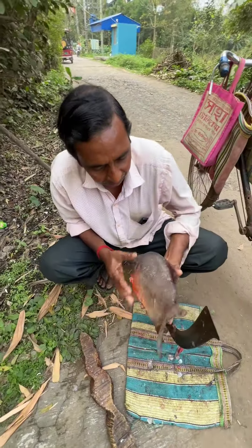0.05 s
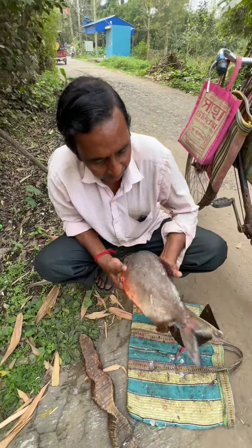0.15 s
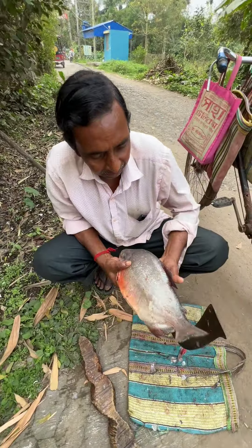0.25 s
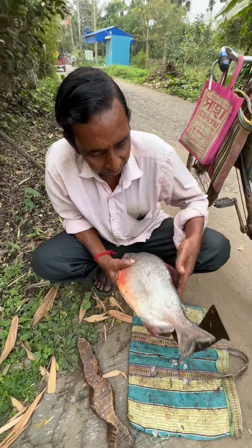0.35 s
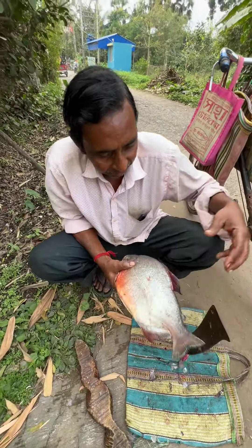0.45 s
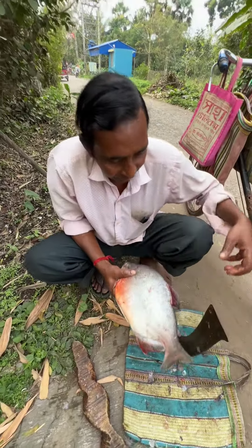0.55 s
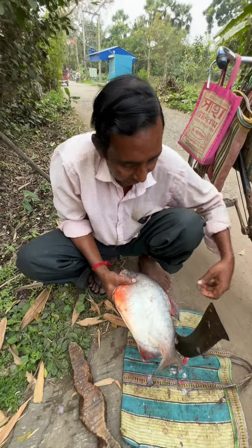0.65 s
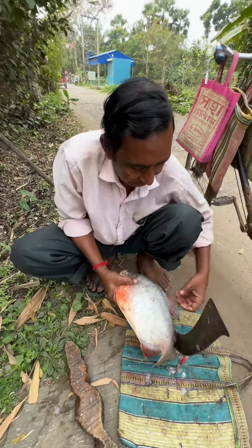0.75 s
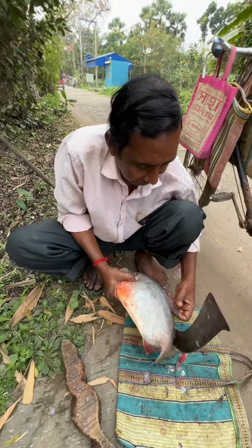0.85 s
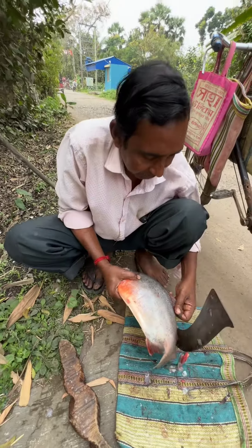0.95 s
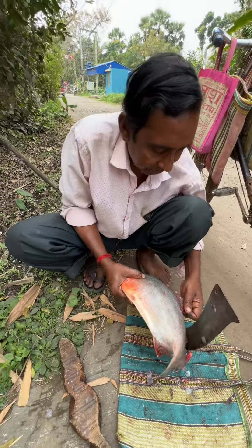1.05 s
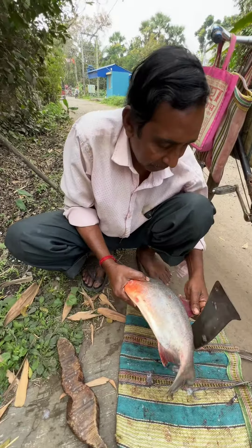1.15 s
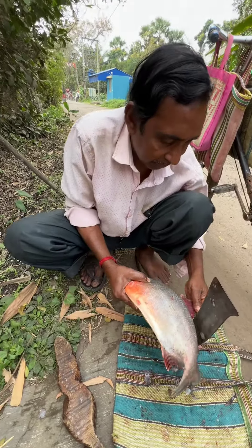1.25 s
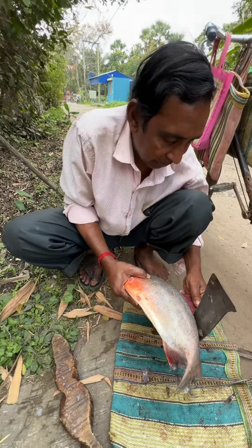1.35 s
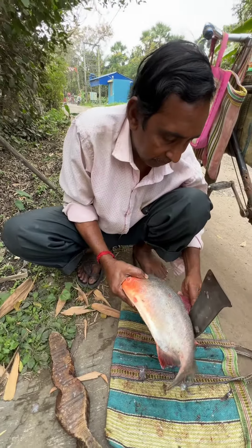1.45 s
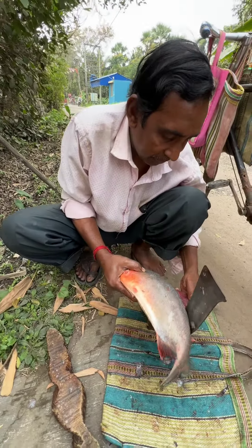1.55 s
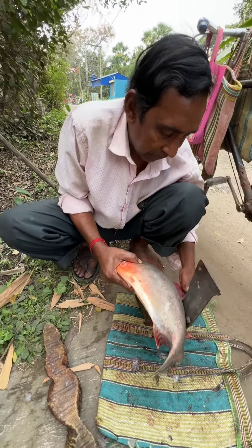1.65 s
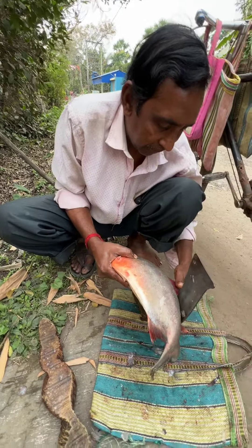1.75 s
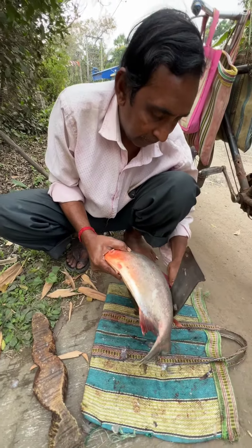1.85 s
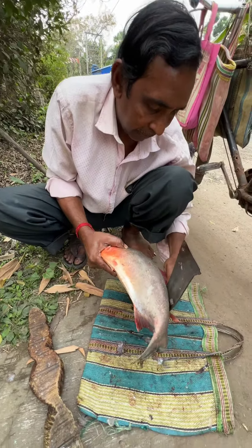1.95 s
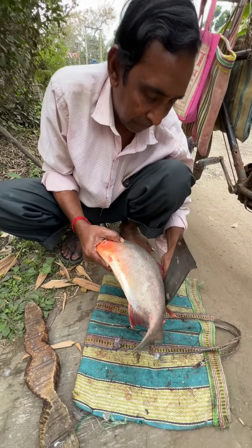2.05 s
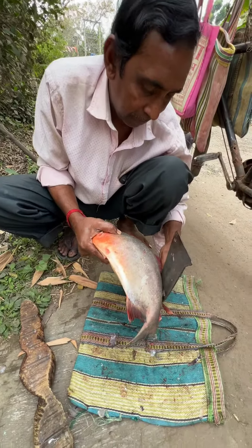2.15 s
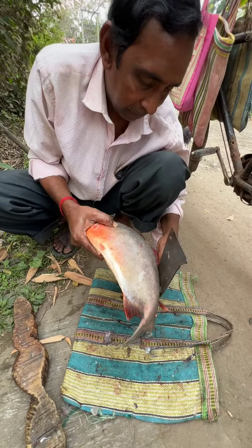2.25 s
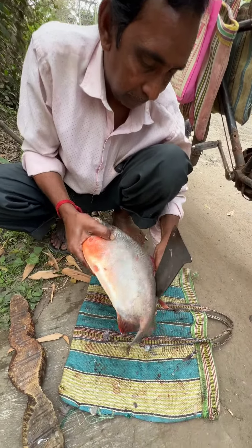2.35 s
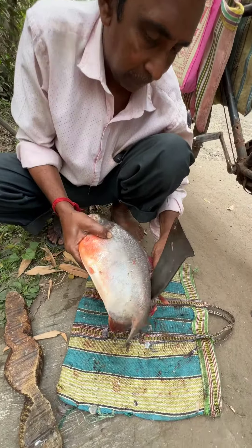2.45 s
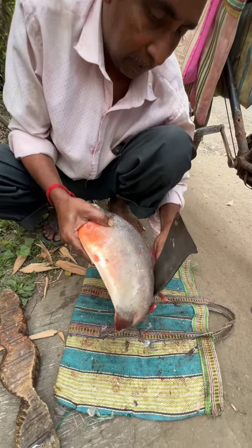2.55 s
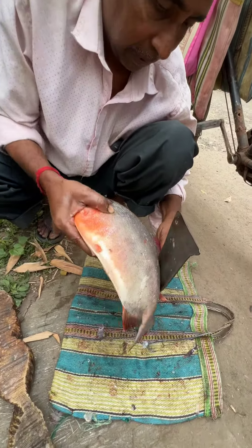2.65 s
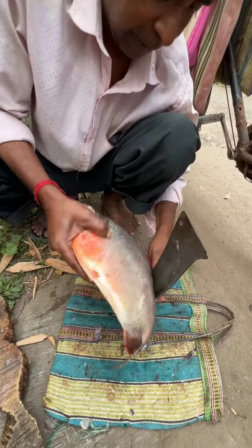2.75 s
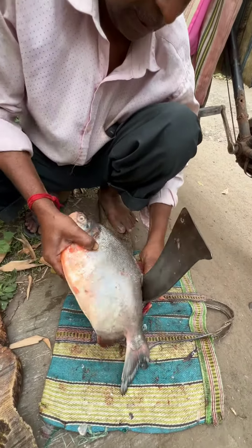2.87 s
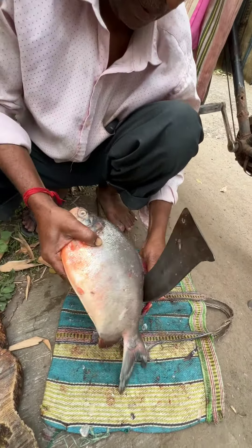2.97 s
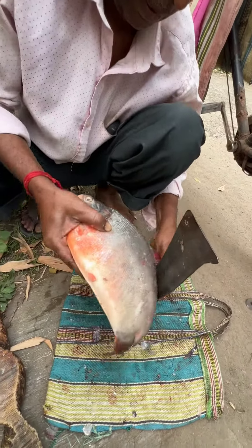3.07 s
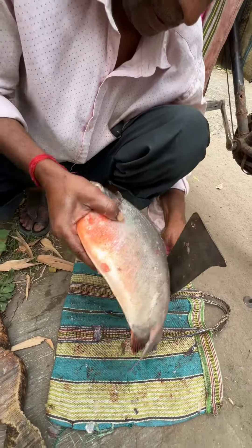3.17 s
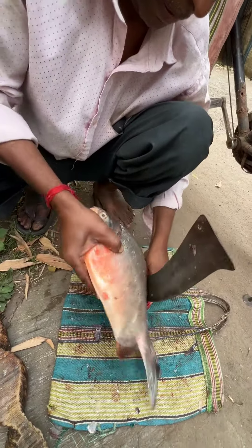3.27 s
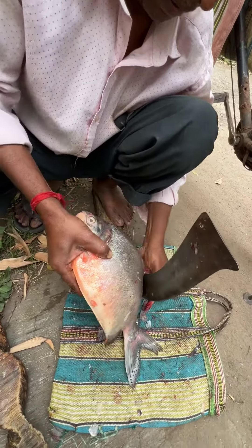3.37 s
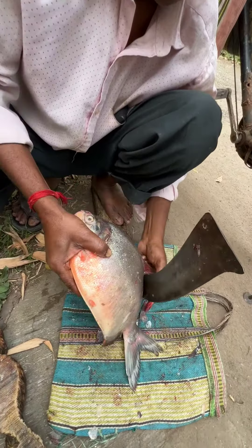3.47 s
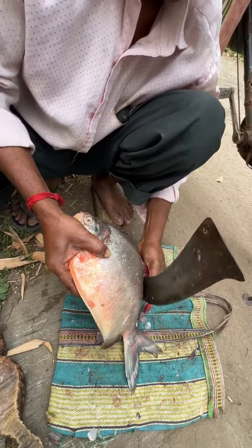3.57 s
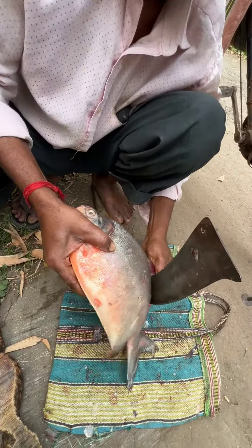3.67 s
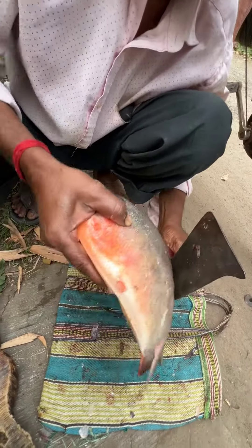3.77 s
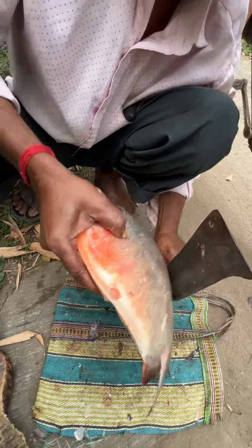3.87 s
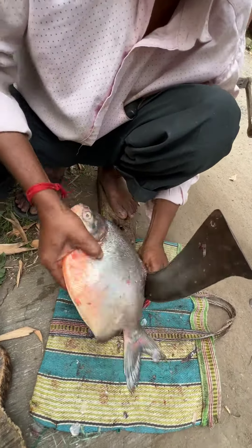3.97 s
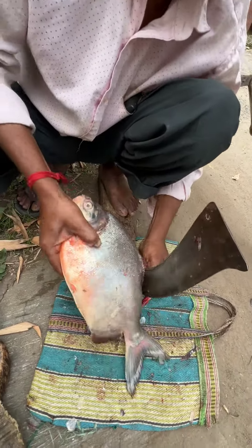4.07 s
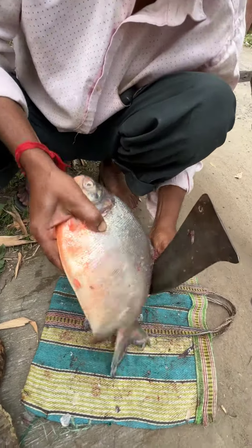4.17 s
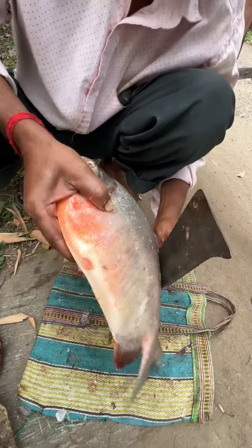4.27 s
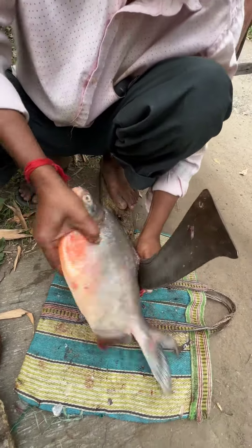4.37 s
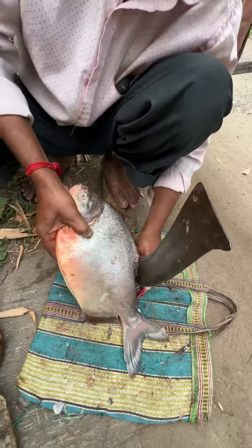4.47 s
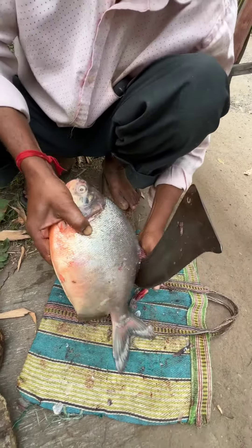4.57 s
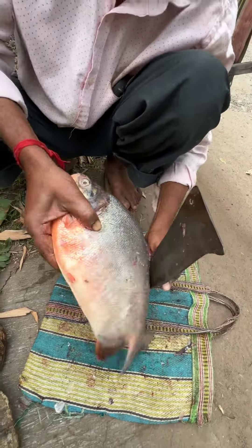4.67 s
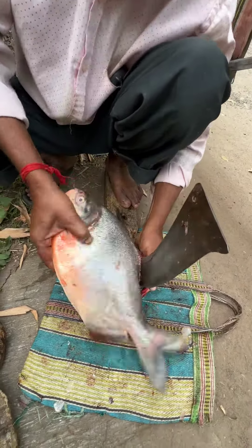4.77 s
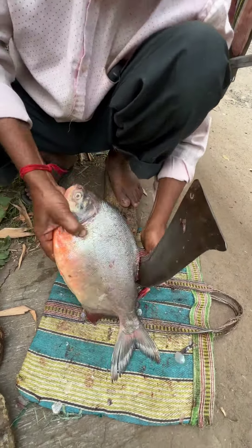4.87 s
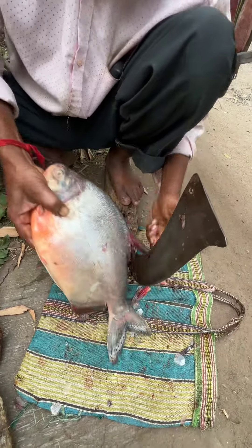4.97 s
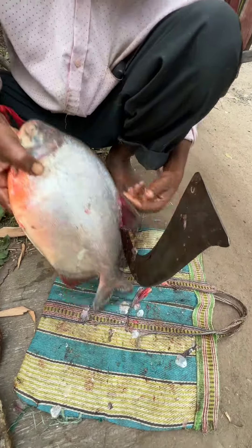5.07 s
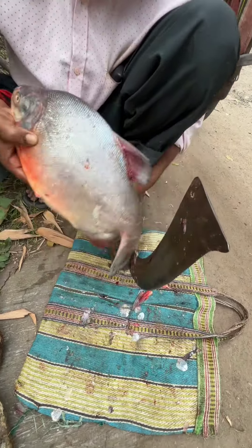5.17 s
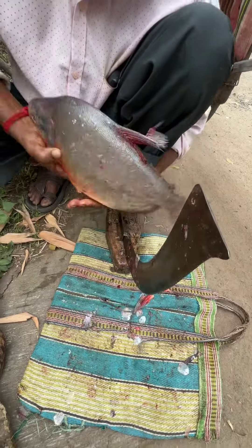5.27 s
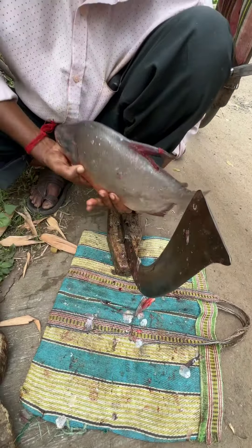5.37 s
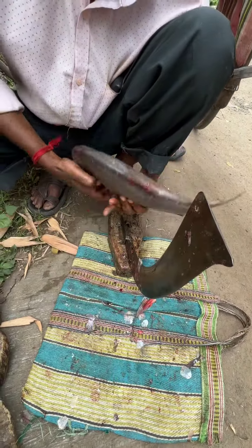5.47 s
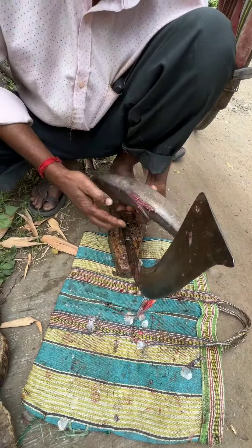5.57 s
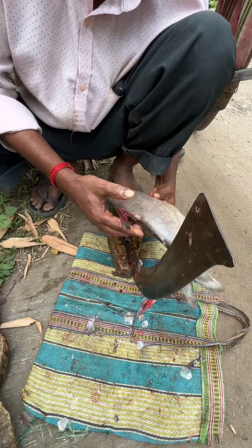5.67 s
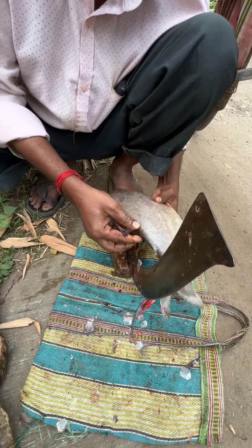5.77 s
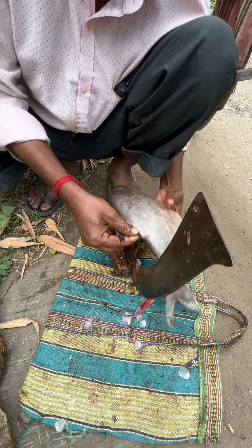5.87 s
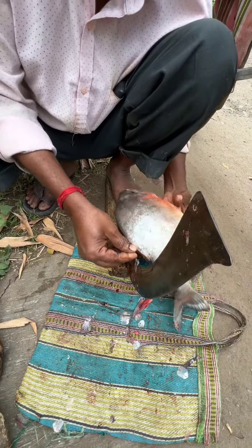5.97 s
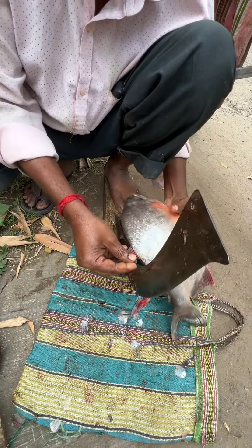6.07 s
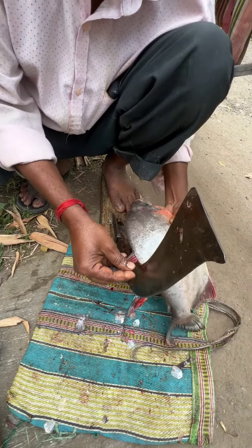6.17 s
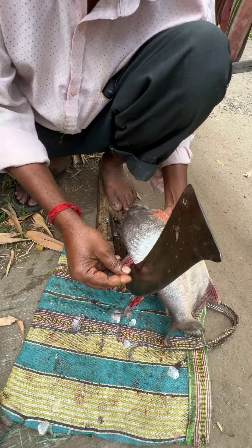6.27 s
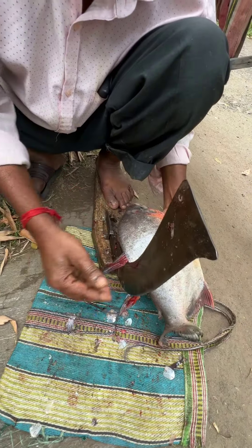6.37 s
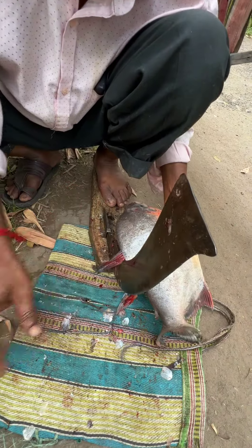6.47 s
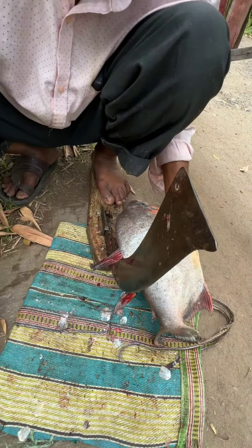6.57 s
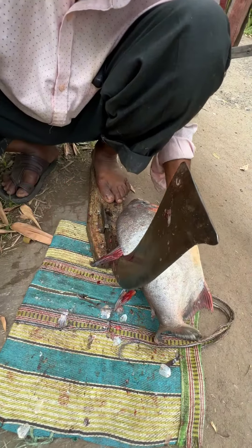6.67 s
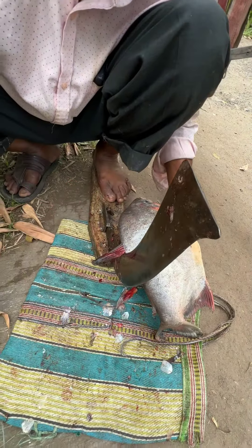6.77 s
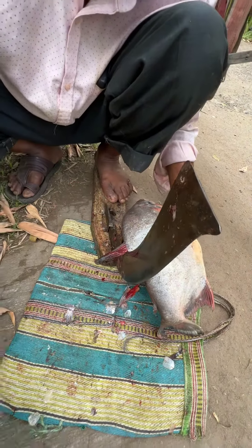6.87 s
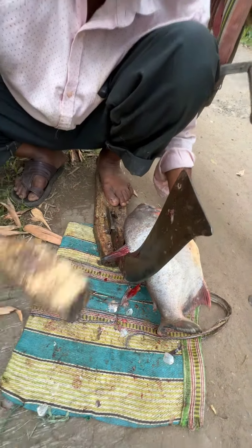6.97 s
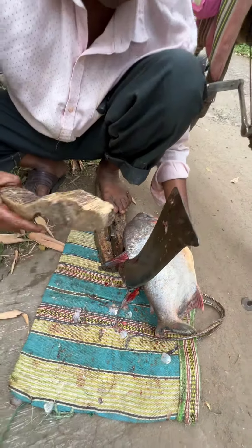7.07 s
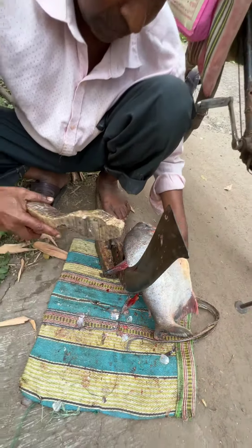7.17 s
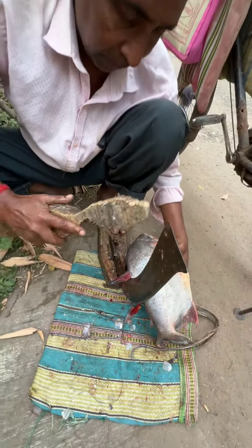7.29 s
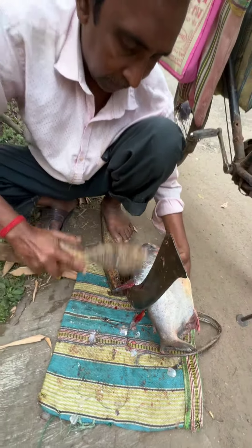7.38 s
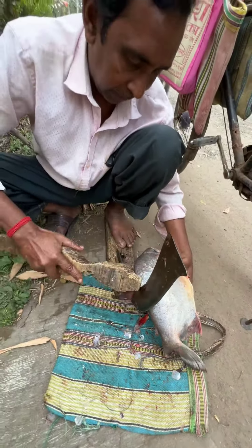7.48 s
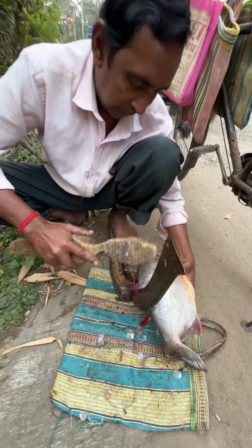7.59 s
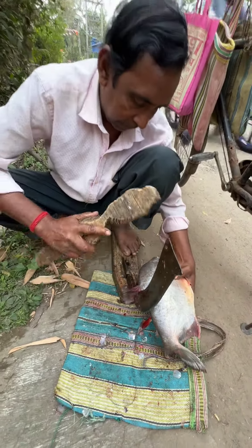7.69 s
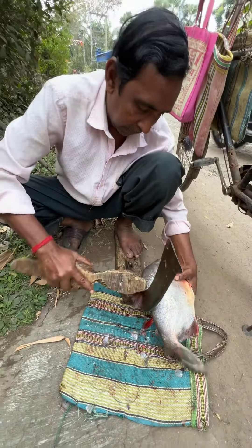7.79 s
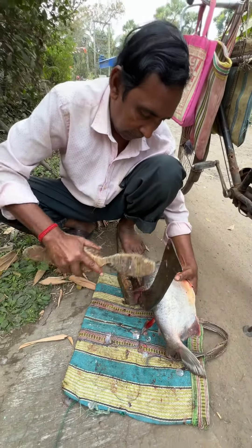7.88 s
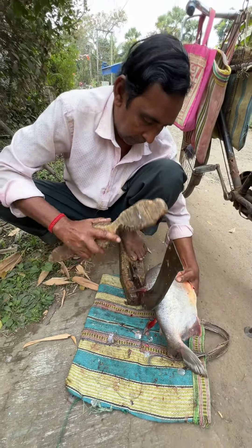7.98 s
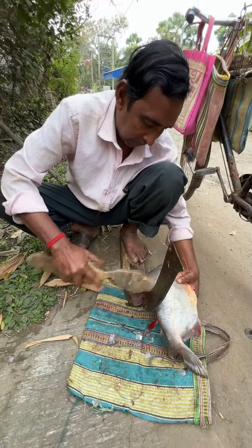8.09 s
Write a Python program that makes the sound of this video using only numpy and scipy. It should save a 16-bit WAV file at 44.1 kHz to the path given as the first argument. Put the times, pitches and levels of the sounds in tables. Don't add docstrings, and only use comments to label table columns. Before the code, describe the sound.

A fish is turned with quiet, damp scrapes while a distant bird whistles. From just after two seconds it is pushed against a steel edge in irregular strokes: dry crackling, hard clicks, short metallic pings, small squeaks. The work pauses, cloth rustles faintly, and a puttering vehicle grows from far off to loud. Woody knocks and a squeak finish over its throb. Close, dry, open-air phone pickup.

```python
import sys
import numpy as np
from scipy import signal
from scipy.fft import rfft, irfft, next_fast_len
from scipy.io import wavfile
from scipy.ndimage import uniform_filter1d, map_coordinates

SR = 44100
rng = np.random.default_rng(int(sys.argv[2]) if len(sys.argv) > 2 else 0)


def to_linear_factor(level_db):
    exponent = np.asarray(level_db, float) / 20
    return 10 ** exponent


def digitize_waveform(pressure):
    field = np.atleast_2d(pressure).T
    bounded = np.clip(field, -1, 1)
    quanta = np.round(bounded * 32767).astype(np.int16)
    wavfile.write(sys.argv[1], SR, quanta)


N = 358533

# (time [s], length [s], share of length at most pressure [0-1],
# rasp level [dB], flesh level over rasp [dB])
TURN_STROKES = [(0, 0.083, 0.3, -49, 4), (.183, 0.08, 0.25, -36, -2.5), (.393, 0.081, 0.76, -43.5, 5),
                (.559, 0.041, 0.34, -38, -4), (.59, 0.098, 0, -30.5, -4), (.86, 0.11, 0.5, -36, 0.5),
                (1.084, 0.1, 0.2, -45, -5), (2.208, 0.067, 0.6, -35.5, -7.5)]
CUT_STROKES = [(2.3, 0.072, 0.97, -43, 0.5), (2.361, 0.1, 0.38, -38, -0.5), (2.58, 0.097, 0.47, -51.5, -1),
               (2.737, 0.12, 0.67, -27.5, -3.5), (3.007, 0.049, 0.21, -32, -8.5),
               (3.217, 0.074, 0.72, -30.5, -1), (3.273, 0.077, 0.19, -32, -7),
               (3.539, 0.067, 0.45, -31.5, -1.5), (3.68, 0.057, 0.396, -22.5, -6),
               (3.72, 0.114, 0, -46.5, 5), (3.868, 0.1206, 0.63, -33, 3.5),
               (3.993, 0.01503, 0.28, -14.5, -25), (4.145, 0.069, 0.21, -43, 1.5),
               (4.33, 0.083, 0.073, -33.5, 4.5), (4.39, 0.065, 0, -30.5, -8),
               (4.567, 0.0257, 0.59, -50.5, 6.5), (4.61, 0.055, 0.386, -53.5, 7.5),
               (4.71, 0.078, 0, -40, 5), (4.811, 0.05, 0.55, -42, -15), (5.19, 0.082, 0, -33.5, -18.5),
               (5.15, .024, 0.64, -49, -16), (4.965, 0.043, 0.11, -50, -9)]
CLUB_STROKES = [(7.243, 0.068, 0.61, -27, 1), (7.328, 0.087, 0.53, -25.5, 0.43),
                (7.433, 0.04, 0.091, -25.5, 2), (7.785, 0.0605, 0.105, -30, 3.6)]
# (frequency [Hz], level [dB per Hz])
SCALE_SPECTRUM = [(1760, -21.5), (3000, -12), (4200, -5.5), (5300, -0.5), (6800, -5.5), (8400, -5),
                  (10800, -10.5), (12000, -22.5), (14000, -15.5), (15700, -19), (16200, -32), (16500, -54)]
# (frequency [Hz], level [dB per Hz])
FLESH_SPECTRUM = [(150, -40), (250, -4), (492, -4), (650, -1), (808, -4), (1000, -3), (1440, -4.5),
                  (2340, -6), (3490, -9), (4500, -19), (5850, -45.5), (9900, -120)]
# (time [s], bright crack level [dB], dull crack level [dB], dull centre [Hz])
SNAPS = [(.002, -45, -32, 1500), (0.191, -29, -38, 2410), (0.2972, -45, -31, 1580),
         (.5715, -39, -39.5, 3000), (.605, -36, -31, 2170), (1.767, -30, -22, 1730),
         (2.2957, -26.5, -36, 3470), (2.3261, -14.5, -22.5, 2680), (2.33, -17, -34, 3000),
         (2.374, -11, -25, 3000), (2.393, -11.5, -22, 2730), (2.761, -12, -32, 2200),
         (2.7777, -11, -17, 2720), (2.789, -5.5, -24, 3300), (2.799, -13, -31, 3500),
         (2.8112, -4.5, -20, 3040), (2.821, -7, -14, 2470), (3.016, -23, -36, 3500),
         (3.0228, -38.5, -13.5, 3320), (3.256, -15, -8, 3280), (3.2842, -11.5, -1.5, 3010),
         (3.563, -12, -32, 2360), (3.645, -31, -52.5, 2670), (3.935, -5.5, -1, 3125), (3.997, -3, -7, 3050),
         (4.3398, -7.5, -12.5, 2450), (4.4007, -17, -25, 2640), (4.7138, -2, -13.5, 2380),
         (4.8185, -30, -39, 2800), (5.208, -15, -33, 3500), (5.264, -26, -28, 3500)]
KNOCKS = [(7.2767, -21, -20, 2200), (7.336, -21, -16, 1782), (7.437, -11.5, -12, 3000),
          (7.4425, -17, -8.5, 1880), (7.793, -26, -7, 2700), (7.794, -9, -16, 990),
          (7.8001, -28, -20, 1381), (7.832, -15, -8, 2640), (7.876, -31, -13.5, 2360)]
TICKS = [(1.972, -49, -36, 3000), (2.9859, -28, -42, 3500), (3.1146, -22, -41.5, 3500),
         (3.1445, -36.5, -34, 3500), (3.1824, -31, -42.5, 3500), (3.2294, -21, -21, 2600),
         (3.2592, -10.5, -16, 4000), (3.3216, -20, -33, 3000), (3.5489, -34, -24, 2400),
         (3.8815, -32, -38, 2800), (3.8999, -30, -33, 2800), (3.9375, -12, -19, 3000),
         (4.7947, -32.5, -50.5, 3500), (4.8218, -34, -43, 3500), (4.863, -30, -50.5, 3503),
         (4.908, -45, -54.5, 3540), (4.9686, -37, -52.5, 3500), (5.129, -36, -52, 3511),
         (5.1534, -33, -48, 3500), (5.166, -33, -50, 3500), (5.2038, -18, -31, 3500),
         (7.2664, -23, -20, 2200), (7.2914, -18, -35, 2200), (7.369, -22, -23, 1800),
         (7.4523, -17, -13, 2600), (7.54, -36.5, -23, 2400), (7.5945, -22, -24, 2375),
         (7.6525, -30, -13.5, 2200), (8.035, -19, -33.5, 2400), (8.125, -12, -13, 2400),
         (6.022, -52, -62, 3500), (6.925, -40, -51.5, 3508)]
# (time [s], frequency [Hz], level [dB])
BODY_TAPS = [(.296, 1600, -34.5), (.512, 2070, -39.5), (1.762, 1697, -33.5), (2.82, 279, -24.5),
             (3.284, 336, -26.5), (3.93, 686, -25), (3.941, 980, -26), (3.886, 1050, -34),
             (4.365, 720, -30), (3.57, 950, -34), (3.7, 950, -32), (3.26, 950, -30), (.21, 490, -38),
             (7.834, 620, -22), (7.44, 330, -22), (4.735, 723, -27.5), (7.44, 580, -18), (7.8, 1315, -16.5)]
# (frequency [Hz], level [dB], 60 dB decay [s])
EDGE_MODES = [(7488, 0, .13), (9114, -17, .06), (13770, -22, .03)]
FACE_MODES = [(3750, -15, .045), (4980, -24, .06), (6514, 0, .1), (8400, -11, .08), (8760, -22, .09),
              (9609, -14, .045), (10150, -12, .09), (11050, -15, .1), (12050, -13, .03)]
HEEL_MODES = [(5640, 0, .135), (5803, -5, .06)]
# (time [s], level [dB])
EDGE_RINGS = [(2.2982, -37), (2.392, -36), (2.762, -25), (2.7773, -24), (2.789, -24), (2.8119, -25.5),
              (3.255, -36), (3.2845, -35), (3.937, -26), (3.9978, -19), (4.3404, -30), (4.402, -27),
              (5.2076, -42.5), (5.265, -36), (7.796, -28), (7.808, -25), (2.736, -39), (2.823, -31),
              (3.228, -36)]
FACE_RINGS = [(2.392, -35), (2.762, -25), (2.8119, -32), (3.255, -33), (3.935, -33), (4.7129, -25),
              (5.123, -48), (5.197, -39), (5.204, -30), (5.2077, -19)]
HEEL_RINGS = [(2.325, -39), (2.762, -33.5), (3.253, -32.5), (3.935, -31), (3.998, -28.5), (4.401, -32),
              (5.201, -39), (5.2067, -32), (7.44, -38), (7.797, -27), (7.806, -26), (7.8302, -25),
              (4.957, -52), (4.978, -50), (5.129, -50), (5.262, -46)]
# (time [s], length [s], start [Hz], end [Hz], level [dB])
SQUEAKS = [(0, .085, 2650, 2600, -41), (.02, .08, 720, 700, -42), (.875, .06, 2150, 2400, -42),
           (.885, .045, 4900, 4800, -45), (.6, .055, 2400, 2500, -40), (2.232, 0.0393, 1886, 2033, -42.5),
           (3.286, 0.013, 3080, 1890, -28.5), (3.695, 0.0343, 1807, 2530, -30),
           (7.264, 0.028, 2172, 2270, -27.5), (7.27, 0.033, 5630, 5630, -20),
           (7.358, 0.034, 1305, 2790, -28), (7.438, 0.0118, 1890, 1750, -33),
           (3.688, 0.039, 6100, 6500, -25), (3.692, .032, 7400, 6840, -26), (7.265, 0.033, 7300, 7500, -23),
           (7.467, 0.0072, 1690, 1500, -35.5)]
# (frequency [Hz], lead of left port [rad])
MAT_LEAD = [(300, 0), (700, .9), (1050, .2), (2500, -.4), (3500, -2.1), (4400, -4.3), (5000, -4.8),
            (5600, -4.2), (8000, -5.5), (9300, -4.7), (16000, -4.7)]
EDGE_LEAD = [(300, 0), (650, 1), (1000, 1.2), (1900, .1), (2700, .8), (3700, .3), (4800, 1.9), (5700, 4.9),
             (6500, 5), (7500, 5.8), (9000, 4.9), (16000, 4.6)]
ASIDE_LEAD = [(300, 0), (900, .9), (1900, .3), (2400, .7), (3000, 1.5), (4200, 2.1), (4800, 2.8),
              (5500, 4.1), (7000, 4.7), (8000, 5.3), (9300, 4.7), (16000, 4.7)]
# (frequency [Hz], left-right likeness [-1 to 1])
ALIKE = [(60, 0.96), (180, 1.0), (330, .93), (600, 0.6), (1500, 0.9), (4970, 0.02), (15000, .034)]

# (time [s], firing rate [1/s], exhaust level [dB], lean to higher multiples [dB per multiple])
ENGINE = [(0, 28.3, -62, 0), (1.83, 29, -51.5, 2), (2.42, 31, -39, 1.5), (2.85, 27.6, -42, -3),
          (3.15, 30, -44, 1), (3.6, 27.6, -43, 0), (4.1, 28.2, -41, 0), (4.55, 31.2, -37, 0),
          (4.8, 28.8, -36, -1), (5.13, 30, -33.5, -3), (5.4, 26.5, -31, -1), (5.8, 29.5, -30, -1),
          (6.05, 30.5, -31, 0), (6.13, 33.5, -29, 5), (6.27, 31, -28.5, 4), (6.55, 33, -25.5, 1),
          (7.02, 34.8, -21, 2.5), (7.25, 34.4, -21.5, -1.5), (7.46, 36, -22.5, -15),
          (7.53, 34.4, -18.5, 30), (7.62, 34.4, -13.5, 25), (7.72, 35.2, -12, 2), (7.95, 36.2, -12.5, -3),
          (8.13, 34.6, -12, -4)]
# (frequency [Hz], level [dB])
PIPE = [(60, -40), (105, -13), (135, -1), (150, 0), (178, -4), (196, -16), (225, -40), (280, -56),
        (700, -120)]
# (frequency [Hz], level [dB])
PANEL = [(250, -30), (305, -3), (345, 0), (380, -3), (415, -14), (520, -34)]
# (time [s], level [dB])
PANEL_DRIVE = [(0, -70), (4.5, -62), (5.75, -54), (6.1, -46), (6.9, -43), (7.3, -34), (7.5, -34),
               (7.6, -38), (7.75, -31), (7.9, -37), (8.03, -29), (8.13, -29)]
# (frequency [Hz], level [dB per Hz])
BODY_SPECTRUM = [(120, -35), (200, 3.5), (260, -10), (361, -1.5), (438, -9), (668, -6), (824, -16.5),
                 (1500, -28.5), (1950, -19.5), (3300, -120)]

# (frequency [Hz], level [dB per Hz])
RUMBLE_SPECTRUM = [(13, -57), (22, -20), (47, -1.5), (96, 3), (113, -1.5), (146, -3.5), (205, -14),
                   (269, -12), (300, -19), (390, -65), (660, -120)]
ROAD_SPECTRUM = [(410, -4), (700, -5.5), (825, -4.5), (1460, -7.5), (1650, -11), (2380, 2), (3030, 3),
                 (5000, -9), (6500, -44), (11000, -120)]
TYRE_SPECTRUM = [(410, -17), (700, -11), (825, -2), (1460, -1.5), (1900, -8), (2350, 1), (3000, -5.5),
                 (5000, -15), (8000, -100)]
RUSTLE_SPECTRUM = [(1760, -4.5), (3000, -25), (4540, -0.5), (7320, 1.5), (10300, -3.5), (11700, -9),
                   (13000, -9), (15500, -8), (16000, -40)]
# (time [s], rise [dB/s], fall [dB/s], rustle
# level [dB], duller rubbing over it [dB])
FIDGETS = [(.57, 6, 5, -53, 2), (1.8, 5, 70, -50, 4), (2.19, 110, 90, -50, 0), (3.19, 37, 110, -34.5, -6.5),
           (3.38, 100, 70, -49, -12), (4.21, 30, 42, -42, -5), (4.6, 40, 7, -53, -4),
           (5.55, 12, 25, -55.5, -12), (7.2, 40, 60, -52, 11), (7.6, 40, 20, -44, 0),
           (6.2, 150, 150, -54, -8), (7.0, 150, 150, -54, -5)]
# (time [s], start [Hz], level [dB])
CHIRPS = [(1.05, 2900, -46), (1.235, 3200, -44), (1.302, 2500, -41), (1.49, 2300, -39.5),
          (1.725, 2000, -40), (1.95, 1900, -40.5), (2.15, 2100, -42), (4.99, 2200, -49), (5.228, 2500, -45),
          (5.48, 2800, -50)]
# (time [s], start [Hz], end [Hz], length [s], level [dB])
PEEPS = [(.262, 4200, 3900, .025, -46), (1.075, 3600, 2500, .02, -48), (1.4, 3900, 2600, .02, -48),
         (1.61, 3500, 2300, .02, -45), (1.81, 2600, 2450, .07, -46), (5.298, 3900, 2500, .02, -50),
         (5.11, 2400, 2650, .03, -54), (5.41, 2600, 2450, .06, -60), (5.62, 1420, 1360, .15, -58)]


def unit(x):
    return x / np.sqrt(np.mean(x ** 2) + 1e-20)


def along(points, hz):
    f, v = np.transpose(points)
    return np.interp(np.log(hz + 1), np.log(f + 1), v)


def curves(rows):
    s, *cols = np.transpose(rows)
    return [np.interp(np.arange(N) / SR, s, c) for c in cols]


def wobble(rate):
    return map_coordinates(rng.standard_normal(int(N * rate / SR) + 4), [np.arange(N) * rate / SR])


def filtered(x, response):
    m = next_fast_len(N + SR // 2)
    return irfft(rfft(x, m) * response(np.fft.rfftfreq(m, 1 / SR)), m)[..., :N]


def patched(x, patchy_db):
    z = signal.stft(x, nperseg=256)[2]
    field = uniform_filter1d(rng.standard_normal(z.shape[-2:]), size=4, axis=0)
    field = uniform_filter1d(field, size=14, axis=1)
    return signal.istft(z * to_linear_factor(patchy_db * unit(field)), nperseg=256)[1][..., :N]


def grit(spectrum, per_s, spread_db, clump_db, patchy_db):
    caught = rng.random(N) < per_s / SR
    ticks = caught * to_linear_factor(spread_db * rng.exponential(size=N)) * rng.standard_normal(N)
    ticks = patched(ticks * to_linear_factor(clump_db * wobble(220)), patchy_db)
    return unit(filtered(ticks, lambda hz: to_linear_factor(along(spectrum, hz))))


def resonances(modes):
    def response(f):
        total = 0
        for k, (centre, width, db) in enumerate(modes):
            total = total + (-1) ** k * to_linear_factor(db) * 1j * f * width / (centre ** 2 - f ** 2 + 1j * f * width)
        return total
    return response


def strokes():
    rasp, flesh = np.zeros(N), np.zeros(N)
    hide = grit(FLESH_SPECTRUM, per_s=3500, spread_db=1.6, clump_db=2.6, patchy_db=2)
    kinds = [(TURN_STROKES, 2390), (CUT_STROKES, 2900), (CLUB_STROKES, 2200)]
    rows = [(*row, flesh_hz) for kind, flesh_hz in kinds for row in kind]
    for s, length, share, rasp_db, flesh_db, flesh_hz in rows:
        a, b = round(s * SR), round((s + length) * SR)
        lean = np.interp(np.linspace(0, 1, b - a), [0, np.clip(share, .05, .95), 1], [1, 0, 1])
        press = signal.windows.tukey(b - a, .42) * to_linear_factor(rasp_db + 1.5 - 15 * lean ** 1.7)
        note = signal.lfilter(*signal.iirpeak(flesh_hz, 4.5, fs=SR), hide[a:b])
        rasp[a:b] += press
        flesh[a:b] += press * to_linear_factor(flesh_db) * (.8 * hide[a:b] + .55 * note)
    blade = resonances([(hz, 2.2 / t60, db) for hz, db, t60 in EDGE_MODES + FACE_MODES + HEEL_MODES])
    noise = rng.standard_normal(N)
    singing = to_linear_factor(-28) * filtered(rasp * noise, blade) / np.std(filtered(noise, blade))
    scales = grit(SCALE_SPECTRUM, per_s=7000, spread_db=1.3, clump_db=3.3, patchy_db=2.3)
    return rasp * scales + flesh + singing


def blade_rings(out):
    t = np.arange(SR // 4) / SR
    for modes, rings in [(EDGE_MODES, EDGE_RINGS), (FACE_MODES, FACE_RINGS), (HEEL_MODES, HEEL_RINGS)]:
        for s, db in rings:
            ring = np.zeros(len(t))
            for hz, mode_db, t60 in modes:
                ring += to_linear_factor(mode_db + rng.normal(0, 1.5) - 60 * t / t60) * np.sin(2 * np.pi * hz * t)
            out[round(s * SR):][:len(t)] += to_linear_factor(db + 2.5) * ring


def cracks(out):
    t = np.arange(SR // 4) / SR
    bright_band = signal.butter(2, [4800, 10800], "band", fs=SR, output="sos")
    for s, bright_db, dull_db, centre_hz in SNAPS + KNOCKS + TICKS:
        burst = rng.standard_normal(len(t)) * (to_linear_factor(-60 * t / .003) + .25 * to_linear_factor(-60 * t / .03))
        burst[0] = 1.75
        dull_band = signal.butter(2, [centre_hz / 1.56, centre_hz * 1.96], "band", fs=SR, output="sos")
        dull = signal.sosfilt(dull_band, burst)
        bright = signal.sosfilt(bright_band, burst)
        crack = to_linear_factor(dull_db) * dull / abs(dull).max() + to_linear_factor(bright_db + 0.5) * bright / abs(bright).max()
        out[round(s * SR):][:len(t)] += crack


def body_taps(out):
    t = np.arange(SR // 4) / SR
    for s, hz, db in BODY_TAPS:
        tap = np.sin(2 * np.pi * hz * t) * (1 - np.exp(-t / 0.0016))
        out[round(s * SR):][:len(t)] += to_linear_factor(db - 60 * t / 0.042) * tap


def snaps():
    out = np.zeros(N + SR)
    blade_rings(out)
    cracks(out)
    body_taps(out)
    return signal.lfilter(*signal.butter(2, 15000, fs=SR), out[:N])


def squeaks():
    out, width_hz = np.zeros(N), 280
    flutter = unit(filtered(rng.standard_normal(N), lambda hz: 1 / (1 + (hz / width_hz) ** 2)))
    for s, length, from_hz, to_hz, db in SQUEAKS:
        a, n = round(s * SR), round(length * SR)
        glide = np.sin(2 * np.pi * np.cumsum(np.linspace(from_hz, to_hz, n)) / SR)
        out[a:a + n] += to_linear_factor(db) * signal.windows.tukey(n, .6) * (0.33 + flutter[a:a + n]) * glide
    return out


def ports(x, apart_db):
    places = np.digitize(np.arange(N) / SR, (2.285, 7.1))
    both = np.zeros((2, N))
    for place, lead in enumerate([MAT_LEAD, EDGE_LEAD, ASIDE_LEAD]):
        both += filtered(x * (places == place), lambda hz: np.exp(np.outer([.5j, -.5j], along(lead, hz))))
    t = np.arange(SR // 20) / SR
    scatter = rng.standard_normal((2, len(t))) * to_linear_factor(-60 * t / 0.045)
    scatter /= np.linalg.norm(scatter[0])
    return both + to_linear_factor(apart_db) * signal.fftconvolve(np.atleast_2d(x), scatter, axes=1)[:, :N]


def passing(nearest_s, distance_s, db, power):
    return db - 20 * power * np.log10(np.hypot(1, (np.arange(N) / SR - nearest_s) / distance_s))


def rush(spectrum, patchy_db):
    pair = patched(rng.standard_normal((2, N)), patchy_db)

    def mid_side(hz):
        turn = np.arccos(np.clip(along(ALIKE, hz), -1, 1)) / 2
        return to_linear_factor(along(spectrum, hz)) * [np.cos(turn), np.sin(turn)]

    mid, side = filtered(pair, mid_side)
    return unit(np.array([mid + side, mid - side]))


def vehicle():
    rate_hz, exhaust_db, lean_db = curves(ENGINE)
    turns = np.cumsum(rate_hz * (1 + .008 * wobble(12))) / SR

    def tone(k, colour, waver_db):
        level = to_linear_factor(along(colour, k * rate_hz) + waver_db * wobble(8))
        return level * np.cos(2 * np.pi * k * turns + .4 * wobble(7))

    puff = unit(filtered(rng.standard_normal(N), lambda hz: to_linear_factor(along(PIPE, hz))))
    blur = np.interp(exhaust_db, [-48, -33], [1.1, .12])
    tones = sum(to_linear_factor(np.clip(lean_db * (k - 4.5), -30, 0)) * tone(k, PIPE, 1.9) for k in range(2, 8))
    exhaust = unit(unit(tones) + (blur + .08) * puff)
    drone = unit(sum(tone(k, PANEL, 3) * (1 + .4 * wobble(30)) for k in range(8, 15)))

    firing = uniform_filter1d(np.exp(-3 * (turns % 1)), size=24)
    gate = 1 + 0.63 * uniform_filter1d(firing, size=24)
    near_body = to_linear_factor(passing(nearest_s=7.85, distance_s=.75, db=-29, power=1.85))
    body_level = np.hypot(near_body, to_linear_factor(-58))
    body = body_level * unit(gate * rush(BODY_SPECTRUM, patchy_db=2.2))
    body = body + to_linear_factor(curves(PANEL_DRIVE)[0]) * drone
    shudder_db = passing(nearest_s=7.43, distance_s=.16, db=-29, power=2.5)
    shudder = to_linear_factor(shudder_db) * np.cos(3 * np.pi * turns)
    return (to_linear_factor(exhaust_db) * exhaust + shudder) * to_linear_factor([[-.9], [.9]]) + body * to_linear_factor([[-1.1], [1.1]])


def roadside():
    s, rise, fall, db, dull_db = np.transpose(FIDGETS)[..., None]
    late = np.arange(N) / SR - s
    moves = to_linear_factor(db - np.maximum(-rise * late, fall * late))
    quiet_road_db, quiet_leaves_db = -61.5, -60

    axle_db = passing(nearest_s=7.75, distance_s=.45, db=-30, power=1.05)
    lorry_db = passing(nearest_s=3.3, distance_s=1.5, db=-41, power=.5)
    rumble = np.hypot(to_linear_factor(axle_db), to_linear_factor(lorry_db)) * rush(RUMBLE_SPECTRUM, patchy_db=1.0)
    rumble = rumble * to_linear_factor([[-.7], [.7]])

    fidget_db = .9 * wobble(23)
    rubbing = np.hypot(to_linear_factor(quiet_road_db), np.linalg.norm(moves * to_linear_factor(dull_db), axis=0))
    road = to_linear_factor(fidget_db) * rubbing * rush(ROAD_SPECTRUM, patchy_db=2.4)
    tyre_db = passing(nearest_s=8, distance_s=0.46, db=-31, power=2)
    road = road + to_linear_factor(tyre_db) * rush(TYRE_SPECTRUM, patchy_db=1.55)

    dust_db = passing(nearest_s=8, distance_s=0.46, db=-36.5, power=2)
    rustle_power = to_linear_factor(2 * quiet_leaves_db) + np.sum(moves ** 2, axis=0) + to_linear_factor(2 * dust_db)
    rustle_db = 10 * np.log10(rustle_power)
    rustle = rush(RUSTLE_SPECTRUM, patchy_db=1.3)
    top = filtered(rustle, lambda hz: np.clip((hz - 10300) / 900, 0, 1))
    top_db = np.clip(rustle_db + 39 + 4 * wobble(9.6), -11.5, 0)
    rustle = rustle - (1 - to_linear_factor(top_db)) * top
    return rumble + road + to_linear_factor(rustle_db + fidget_db + .8 * wobble(60)) * rustle


def bird():
    out = np.zeros(N + SR)
    top_hz, speed_hz_per_s = 4150, 66000
    chirps = [(s, hz, top_hz, (top_hz - hz) / speed_hz_per_s, db) for s, hz, db in CHIRPS]
    for s, from_hz, to_hz, glide_s, db in chirps + PEEPS:
        stretch = 1.6 if to_hz > from_hz else 1.05
        u = np.arange(round(stretch * glide_s * SR)) / (glide_s * SR)
        hz = from_hz + (to_hz - from_hz) * np.minimum(u, 1) ** .83
        swell = (.6 + .55 * np.minimum(u, 1) ** 1.3) * to_linear_factor(-14 * np.maximum(u - 1, 0))
        swell = swell * np.hanning(len(u)) ** .3
        out[round(s * SR):][:len(u)] += to_linear_factor(db) * swell * np.sin(2 * np.pi * np.cumsum(hz) / SR)
    out[:N] *= 1 + .6 * wobble(600)
    out += to_linear_factor(-11) * np.roll(out, round(.058 * SR))
    t = np.arange(SR) / SR
    trees = rng.standard_normal((2, len(t))) * (to_linear_factor(-60 * t / .14) + .15 * to_linear_factor(-60 * t / .9))
    trees /= np.linalg.norm(trees[0])
    return .9 * out[:N] + to_linear_factor(3) * signal.fftconvolve(out[None], trees, axes=1)[:, :N]


def scene():
    near = ports(strokes() + snaps() + squeaks(), apart_db=-8.5)
    return near + vehicle() + roadside() + bird()


def top_cut(x):
    return signal.sosfilt(signal.butter(12, 16760, fs=SR, output="sos"), x)


def record(dry):
    rounded = dry / (1 + np.abs(dry / .95) ** 6) ** (1 / 6)
    mix = filtered(rounded, lambda hz: hz < 16700)
    return top_cut(mix)


dry = scene()
out = record(dry)
digitize_waveform(out)
```